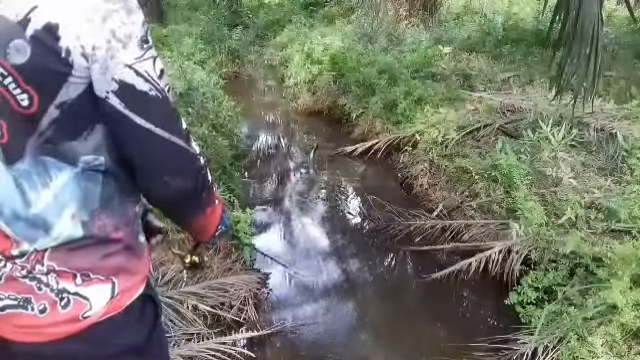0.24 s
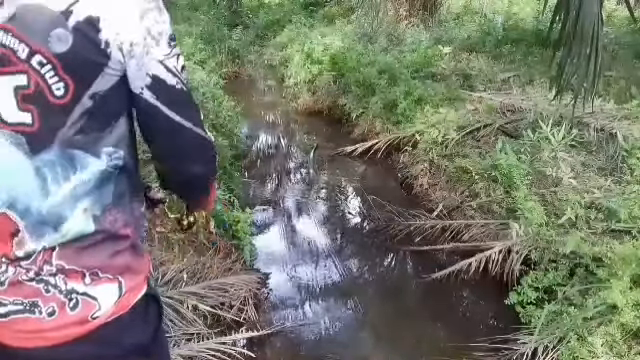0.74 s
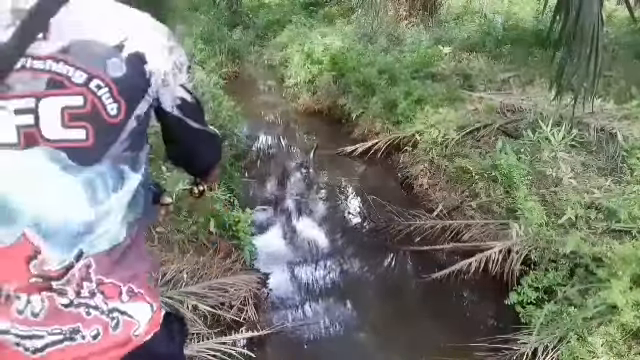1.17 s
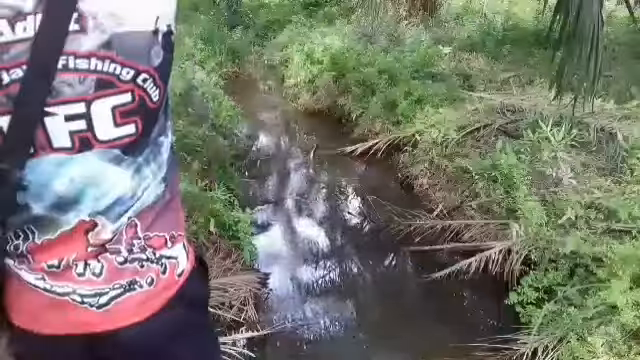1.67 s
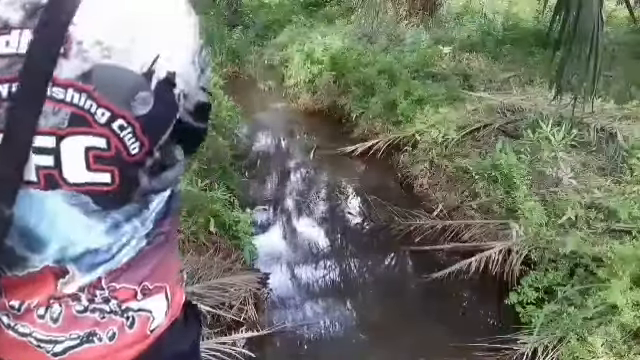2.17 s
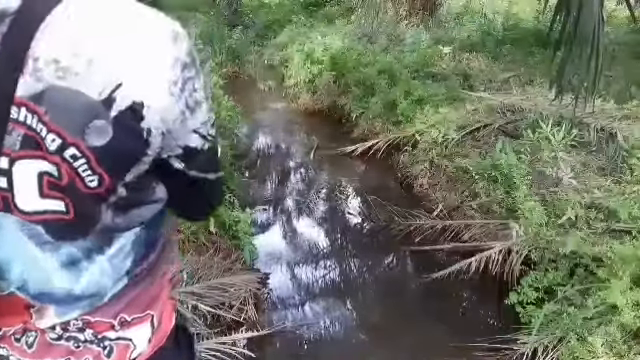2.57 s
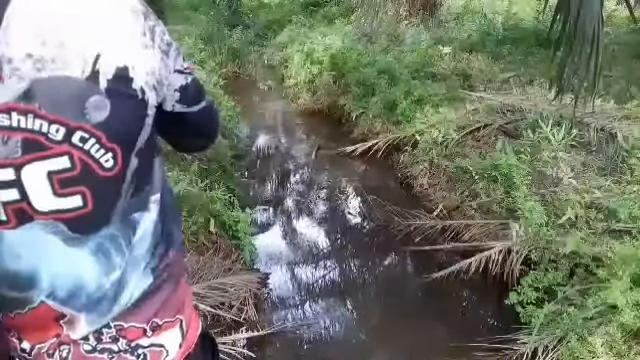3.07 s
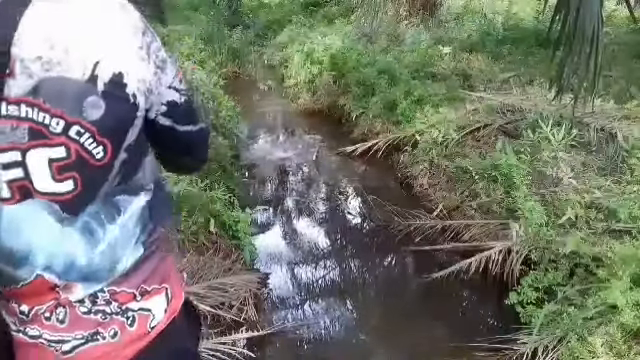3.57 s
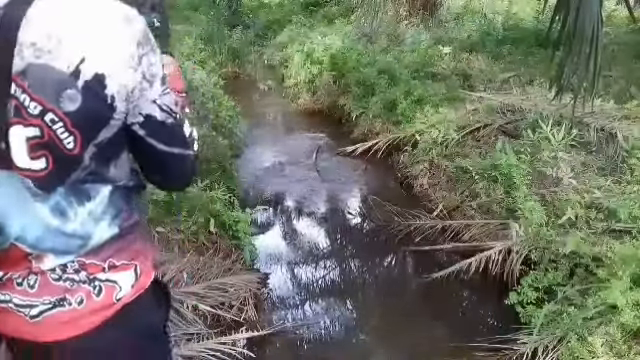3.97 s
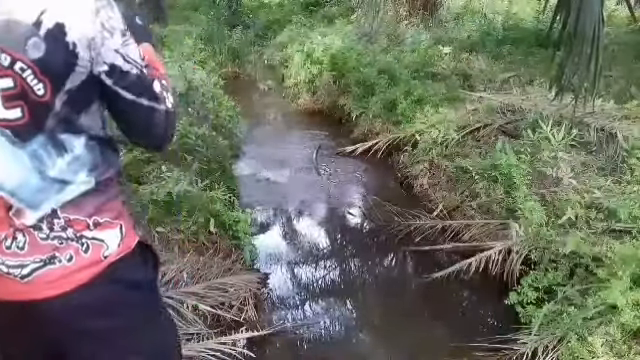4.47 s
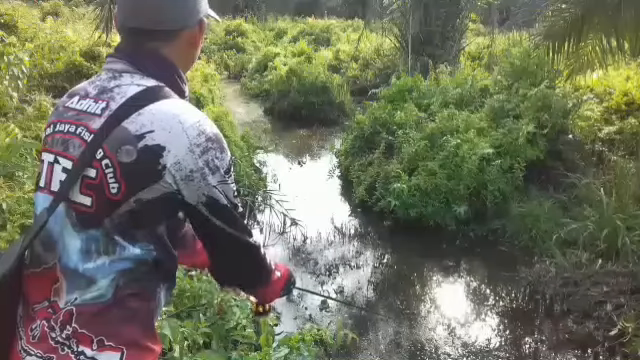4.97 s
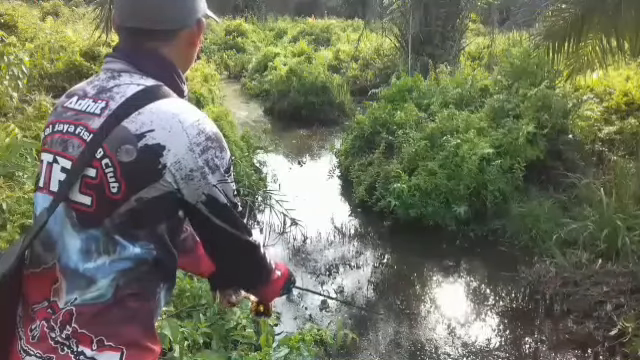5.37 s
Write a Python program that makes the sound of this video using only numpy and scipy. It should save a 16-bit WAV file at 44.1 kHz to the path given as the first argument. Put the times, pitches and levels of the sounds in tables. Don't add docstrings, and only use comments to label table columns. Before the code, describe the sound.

For the first 0.8 seconds there is only quiet open air, soft hiss, distant insects and a very faint high cricket trill. Tiny ticks and light snaps begin, and from about 1.25 s dry palm fronds crackle hard: woody stalks snap, leaf ribs crack, fibres tick and leaflets rustle, with a short whirr of fishing line near 1.5 to 1.6 s. The loudest crack comes at 2.1 s, another bright one at 2.4 s, then the crackle thins until about 3.1 s, with a soft cloth swish at 2.8 s. From 3.3 s something thrashes in the water: hollow bubbles ring upward, drops slap, spray gushes in bursts, with a high gulp at 4.4 s; brief bird notes sound near 4.3 s. At 4.8 s the scene cuts to a calmer spot, with quick gliding bird whistles over faint far cicadas. The microphone resonates sharply on the snaps.

```python
import sys
import numpy as np
from scipy import signal
from scipy.fft import rfft, irfft, next_fast_len
from scipy.io import wavfile

SR = 44100
rng = np.random.default_rng(int(sys.argv[2]) if len(sys.argv) > 2 else 0)


def to_wav(sig):
    pcm = np.clip(np.atleast_2d(sig), -1, 1) * 32767
    pcm = np.round(pcm).astype(np.int16)
    wavfile.write(sys.argv[1], SR, pcm.T)


def boost_factor(decibels):
    exponent = np.asarray(decibels, float) / 20
    return 10 ** exponent


N = 248283
SCENE_CHANGE_S = 4.821
PORT_HZ, PORT_WIDTH_HZ = 4200, 950

# t/s, peak/dB, extra wood/dB
STALKS = [(.7908, -55, -1), (.817, -47, -1), (1.1137, -46.5, -4), (1.1673, -51, -2), (1.2610, -41.5, -5),
          (1.2913, -36.5, -2.5), (1.3303, -30, -9), (1.3386, -33.5, -3.5), (1.4497, -30.5, -9),
          (1.5975, -20.5, -6.5), (1.716, -38, -2.5), (1.8618, -37, -2), (2.0348, -34, -0.5),
          (2.2177, -34.5, -1.5), (2.3447, -40, 0.5), (2.4826, -35, -5), (2.5077, -44, 0), (2.5847, -28, 1),
          (2.8275, -42, -3), (2.9106, -41, -5), (3.114, -42.5, 5.5), (1.4155, -36.5, -2.5),
          (1.4134, -35, -1), (2.2243, -40, 1), (2.2262, -40, 0), (2.2221, -41, 3), (2.2286, -41, 0),
          (2.9038, -47, 4.5)]
# t/s, peak/dB, extra breadth/dB
RIBS = [(.0582, -59, 12), (.8718, -55.5, 1), (1.209, -52, 3), (1.3166, -21.5, 1), (1.4096, -33.5, 6),
        (1.503, -34, -5), (1.523, -22, 2), (1.6287, -27, 10), (1.7111, -35, 11), (1.8893, -26, 14),
        (1.95, -33, 4), (2.0265, -26, 0), (2.1126, -12.5, 12), (2.1905, -33.5, 6), (2.3027, -30, 13.5),
        (2.4012, -29, 1), (2.5683, -23, 5), (2.619, -43, 7), (2.631, -43, 10), (2.695, -40, 3),
        (2.7362, -37.5, -6), (3.0922, -36, 10), (1.5686, -27.5, 8.5), (2.4159, -22.5, 14)]
# t/s, peak/dB, extra tick/dB
FIBRES = [(1.3867, -47, -2), (1.4064, -32, -2), (1.9591, -31, -1), (1.9632, -21, -2), (1.9645, -24, -12),
          (1.985, -34, -3), (1.9871, -35, 1), (2.0091, -27.5, 1), (2.0125, -30, -2), (2.0483, -31, 0),
          (2.091, -46, 6), (2.1098, -39, -7), (2.1544, -34.5, -3), (2.2855, -44, -2), (2.3183, -36, -4),
          (2.3329, -36, -1), (2.3827, -32, -7), (2.3967, -17.5, 7.5), (2.4097, -42, 0), (2.444, -36, -2),
          (2.7817, -39, 3), (2.7937, -36, 0), (2.1246, -34, 6)]
# t/s, peak/dB, extra breadth/dB
TICKS = [(1.042, -60, 7), (1.0512, -59, 5), (1.0811, -60, 5), (1.1052, -58, 0), (1.2003, -56, 1),
         (1.3229, -45, -3), (1.3739, -46, 0), (1.4424, -44, -6), (1.4449, -40, -3), (1.5994, -36, 5),
         (1.6396, -37, 10), (1.6622, -39, 8), (1.6926, -46, 6), (1.7039, -45, 3), (1.7184, -46, 0),
         (1.7626, -44, 7), (1.7732, -47, 0), (1.7954, -44, 5), (1.824, -47, 7), (1.8303, -47, 3),
         (1.8713, -37.5, 0), (1.9012, -31, 1), (1.9229, -41, 1), (1.9814, -31, -2), (2.0245, -36, 4),
         (2.0804, -43, 2), (2.1142, -26, 3), (2.1201, -37, 1), (2.2048, -41, 2), (2.2623, -45, -2),
         (2.3043, -36, -2), (2.3093, -41, -4), (2.3991, -29, 6), (2.4258, -33, -5), (2.4719, -46, 1),
         (2.5808, -47, -2), (2.6487, -45, 0), (2.6608, -42, -9), (2.7963, -46, 1), (2.8191, -46, 3),
         (2.8782, -55, 1), (2.8824, -46, -2), (3.2658, -56, 0), (3.2905, -53, 5), (3.3441, -46, 2)]
# low f/Hz, high f/Hz
SNAP_BANDS = [
    (350, 1200),
    (1200, 2800),
    (6000, 9500),
    (10000, 15500),
]
# t/s, peak/dB
CRISP = [
    (1.3168, -38),
    (1.5977, -36),
    (1.629, -44),
    (2.1127, -22),
    (2.2177, -46),
    (2.2855, -52),
    (2.3967, -24),
    (2.5684, -42),
    (2.7937, -48),
    (3.0922, -52),
]
# t/s, level/dB
BRUSH = [(0.8, -101), (1.03, -82), (1.1, -70), (1.25, -70), (1.35, -62), (1.45, -53), (1.51, -47),
         (1.6, -49.5), (1.67, -56.5), (1.78, -59.5), (1.94, -52.5), (2.05, -60.5), (2.22, -54.5),
         (2.29, -58.5), (2.43, -54.5), (2.55, -61), (2.75, -61.5), (2.89, -68.5), (3.15, -70), (3.2, -66),
         (3.36, -67)]
# t/s, level/dB, length/s
SWISH = [
    (2.815, -57, 0.18),
]
# t/s, peak/dB, f/Hz, length/s
KNOCKS = [(1.409, -39.5, 820, 0.0072), (1.465, -42, 1000, 0.031), (1.636, -43.5, 500, 0.024),
          (2.2, -44.5, 860, 0.034), (2.2, -45, 1060, 0.0034), (2.3, -46, 670, 0.0014),
          (3.27, -45.5, 800, .02), (3.739, -48, 284, 0.045), (3.763, -44, 450, 0.0075),
          (3.3, -49, 970, 0.025), (2, -44.5, 620, 0.0029), (4.715, -49, 1180, 0.026),
          (4.602, -35.5, 740, 0.015), (2.901, -57, 370, 0.072)]
# t/s, level/dB, length/s, brightness/(dB per octave)
WHIRR = [
    (1.494, -44, 0.11, -6),
    (1.542, -41.5, 0.095, -5),
    (1.575, -47, .05, 3),
    (1.633, -52, .03, -8),
    (1.782, -57, .1, 0),
    (2.99, -60.5, 0.073, -7),
]
# f/Hz, width/Hz, level/dB
WHIRR_PEAKS = [
    (6450, 300, -2),
    (6500, 1100, -4),
    (9990, 130, -5),
    (10450, 300, -13),
    (12500, 5500, -9.5),
    (15000, 2000, -13),
]
# t/s, level/dB
SPLASH = [(3.28, -65), (3.372, -61.5), (3.394, -47), (3.43, -52.5), (3.55, -57), (3.62, -52), (3.71, -57),
          (3.785, -50), (3.83, -57), (3.9, -52), (3.96, -57), (4.07, -50), (4.176, -49.5), (4.3, -60),
          (4.46, -60), (4.49, -54), (4.614, -48), (4.66, -57), (4.82, -66.5)]
# t/s, peak/dB, f/Hz
PLOPS = [(3.279, -50, 710), (3.357, -47, 2170), (3.394, -33, 1110), (3.411, -30, 2250), (3.437, -40, 845),
         (3.487, -54, 734), (3.503, -46, 1230), (3.527, -41, 2150), (3.573, -31, 1460), (3.582, -41.5, 730),
         (3.612, -31, 2600), (3.656, -38.5, 858), (3.781, -37, 1160), (3.799, -44, 820), (3.88, -54, 1220),
         (4.011, -41, 900), (4.04, -43, 1360), (4.07, -37, 1224), (4.109, -37, 1370), (4.127, -38, 960),
         (4.159, -30.5, 1230), (4.271, -40.5, 1370), (4.364, -45, 1320), (4.424, -35, 1700),
         (4.483, -43, 767), (4.515, -38.5, 1250), (4.564, -34.5, 946), (4.604, -31, 1510),
         (4.702, -37, 2140), (4.73, -41, 867), (3.893, -40.5, 755), (3.93, -42, 880), (4.14, -44, 870),
         (4.205, -44, 1040), (4.725, -35, 2100), (4.765, -49, 890), (4.78, -49, 870), (4.795, -50, 855),
         (4.63, -42, 1510),
         (4.424, -25.5, 3000),
    (4.555, -29.5, 2780),
]
# t/s, peak/dB
SLAPS = [(3.2798, -42), (3.319, -45), (3.3876, -37), (3.3908, -38), (3.4469, -42), (3.4873, -35),
         (3.5242, -41), (3.611, -40), (3.6783, -41), (3.7263, -42), (3.787, -45), (3.8063, -38),
         (3.854, -38), (3.8659, -40), (3.8817, -36), (3.9268, -45), (3.9709, -40), (4.0066, -40),
         (4.0212, -33), (4.0993, -38), (4.16, -33), (4.2202, -41), (4.254, -43), (4.37, -39),
         (4.4246, -38.5), (4.5407, -40), (4.5889, -34), (4.6076, -44), (4.6772, -42), (4.7977, -44),
         (4.8086, -37.5), (4.8135, -34)]
# t/s, level/dB, dying time/s
GUSHES = [(3.379, -46, 0.034), (3.599, -57.5, 0.036), (3.655, -62, 0.012), (3.722, -56, 0.011),
          (3.78, -54, 0.03), (3.852, -55, 0.014), (3.879, -45.5, 0.013), (3.92, -60, 0.015),
          (4.019, -46.5, 0.032), (4.042, -49, 0.035), (4.105, -53, 0.024), (4.156, -47, 0.024),
          (4.185, -52, .02), (4.334, -55.5, 0.03), (4.36, -52, .008), (4.42, -45, 0.0078),
          (4.47, -55, 0.026), (4.55, -53, 0.046), (4.585, -53, 0.0088), (4.702, -52.5, 0.023),
          (4.806, -50, 0.0091)]
# f/Hz, level/dB
SPRAY = [(880, 22), (1500, -29), (1650, -9), (2400, -2.5), (2620, 3), (2780, -2), (4270, 8.5), (6960, -16),
         (14900, -24), (15500, -19)]
# t/s, level/dB
CRICKET = [(0, -89), (.2, -87), (.3, -81), (1.4, -82), (2.5, -74), (3.2, -80.5), (4.82, -74)]
# f/Hz, width/Hz, level/dB
FAR_INSECTS = [
    (3700, 1300, -79.5),
    (9300, 280, -92),
]
# t/s, length/s, end f/Hz, peak/dB
PLUNGES = [(4.908, 0.043, 4140, -57), (5.244, 0.017, 3520, -63), (5.4, 0.011, 3870, -53),
           (5.482, 0.014, 3500, -62), (5.54, 0.015, 3700, -51), (5.584, 0.0135, 3360, -56),
           (5.596, .012, 2950, -65), (5.384, .012, 4030, -57)]
# t/s, length/s, end f/Hz, peak/dB
DIPS = [(5.04, 0.019, 3960, -70), (5.134, 0.029, 4370, -51.5), (5.332, 0.028, 3870, -51),
        (5.453, 0.021, 4520, -56), (5.467, 0.042, 3920, -68)]
# t/s, length/s, end f/Hz, peak/dB
SAGS = [(.59, 0.103, 3500, -77.5), (.14, .06, 3850, -81), (4.292, 0.03, 3600, -48), (4.315, .03, 3480, -50),
        (4.338, 0.032, 3680, -46), (5.07, 0.028, 3590, -67), (5.155, 0.015, 4400, -64),
        (4.5, .017, 4500, -74), (5.455, .012, 4800, -66), (4.865, .012, 5900, -70)]
# t/s, length/s, end f/Hz, peak/dB
LIFTS = [(4.88, .023, 3930, -56), (5.312, 0.013, 3550, -63), (5.517, 0.027, 4130, -48),
         (5.27, .025, 4100, -69), (5.562, 0.013, 4900, -63), (5.089, 0.03, 4160, -69),
         (5.205, .02, 4450, -69)]
# t/s, length/s, end f/Hz, peak/dB
CALLS_LOW = [(5.02, 0.035, 2420, -70), (5.054, 0.03, 2580, -67), (5.345, .017, 2340, -66),
             (5.525, 0.024, 2370, -65)]
# t/s, length/s, end f/Hz, peak/dB
SCOOPS = [(5.217, 0.029, 4120, -58), (5.418, 0.018, 3890, -53.5), (5.572, 0.014, 3730, -59),
          (5.6, 0.013, 3750, -63), (5.535, 0.022, 4670, -62)]
# f/Hz, width/Hz, level/dB
CICADAS = [
    (8140, 240, 0),
    (8450, 260, 1),
    (9200, 500, -6),
    (9750, 500, -15),
]
# f/Hz, level/dB
AIR_FIRST = [(15, -65), (25, -14), (50, -7), (92, -10), (134, -6.5), (206, -6.5), (285, -8), (405, -9.5),
             (754, -10.5), (2350, -18), (2610, -20), (3250, -30), (8360, -27), (16000, -29)]
# f/Hz, level/dB
AIR_SECOND = [(15, -33), (25, -21), (55, -23.5), (575, -22), (2840, -31), (4370, -30.5), (5600, -38.5),
              (7600, -37.5), (8300, -33), (10700, -40), (14800, -41.5), (16000, -31.5)]
# f/Hz, level/dB
SIDE_HISS = [(15, -42), (25, -25), (60, -7), (145, -7), (175, -1), (217, -5), (503, -5.5), (545, -6),
             (677, -6.5), (936, -6.5), (3620, -11), (16000, -19)]


def rms_one(x):
    return x / np.sqrt(np.mean(x ** 2) + 1e-24)


def in_time(rows):
    s, *columns = np.transpose(rows)
    clock = np.arange(N) / SR
    return [boost_factor(np.interp(clock, s, c, left=-200, right=-200)) for c in columns]


def drift(rate):
    knots_per_s = 200
    knots = rng.standard_normal(int(N / SR * knots_per_s) + 2)
    r = np.exp(-2 * np.pi * rate / knots_per_s)
    smooth = rms_one(signal.lfilter([1], [1, -r], knots))
    return np.interp(np.arange(N) / SR * knots_per_s, np.arange(len(knots)), smooth)


def peak(x, hz, width_hz):
    r = np.exp(-np.pi * width_hz / SR)
    ring = [1, -2 * r * np.cos(2 * np.pi * hz / SR), r * r]
    return signal.lfilter([(1 - r * r) / 2, 0, (r * r - 1) / 2], ring, x + 1e-18)


def band(x, low_hz, high_hz, order=2):
    return signal.sosfilt(signal.butter(order, [low_hz, high_hz], "band", fs=SR, output="sos"), x)


def coloured(spectrum):
    size = next_fast_len(N)
    hz, level_db = np.transpose(spectrum)
    bins_hz = np.arange(size // 2 + 1) * SR / size
    shape_db = np.interp(np.log(bins_hz + 1), np.log(hz), level_db)
    return rms_one(irfft(rfft(rng.standard_normal(size)) * boost_factor(shape_db), size)[:N])


def grains(per_s, spread_db, low_hz, high_hz, cycles, clump_db, count=12):
    born = rng.random(N) < per_s * boost_factor(clump_db * drift(25)) / SR
    size = boost_factor(spread_db * np.minimum(rng.exponential(1, N), 4))
    clicks = born * size * rng.choice([-1, 1], N)
    dealt = rng.integers(0, count, N)
    out = np.zeros(N)
    for k, hz in enumerate(np.geomspace(low_hz, high_hz, count)):
        out += peak(clicks * (dealt == k), hz, 2 * hz / cycles) / np.sqrt(hz)
    return rms_one(out)


def patchy(x, patchy_db, rate):
    edges = 1400 * 2 ** np.arange(0, 3.6, .5)
    out = np.zeros(N)
    for k in range(len(edges) - 1):
        out += (-1) ** k * band(x, edges[k], edges[k + 1]) * boost_factor(patchy_db * drift(rate))
    return rms_one(out)


def strokes(rows):
    rise_s, fall_db = .015, 15
    clock = np.arange(N) / SR
    out = np.zeros(N)
    for s, db, length in rows:
        catch = np.clip((clock - s) / rise_s, 0, 1)
        out += catch * boost_factor(db - fall_db * np.clip((clock - s) / length, 0, 4) ** 2)
    return out


def add(out, s, sound):
    i = round(s * SR)
    out[i:i + len(sound)] += sound[:max(N - i, 0)]


def snaps(rows, crack_s, tail_s):
    out, t = np.zeros(N), np.arange(2600) / SR
    s, peak_db, tail_db, *shares_db = np.transpose(rows)
    white = rng.standard_normal((len(s), len(t)))
    white[:, 0] = 6
    lags_s = rng.uniform(.0005, .0013, len(s))
    crack = white * np.exp(-t / crack_s)
    back = np.array([np.roll(c, round(lag * SR)) for c, lag in zip(crack, lags_s)])
    tail = white * boost_factor(tail_db)[:, None] * np.exp(-t / tail_s)
    burst = crack + .5 * back + tail
    port = peak(burst, PORT_HZ, PORT_WIDTH_HZ) + .25 * band(burst, 2800, 6000)
    parts = [band(port, 2800, 6200)]
    parts += [band(band(burst, *edges), *edges) for edges in SNAP_BANDS]
    sounds = 0
    for part, db in zip(parts, [0, *shares_db]):
        sounds = sounds + boost_factor(peak_db + db)[:, None] * part / np.abs(part).max(axis=1, keepdims=True)
    for start, sound in zip(s, sounds):
        add(out, start, sound)
    return out


def fronds():
    # table, level/dB in each snap band, how far the extra dB reaches into each, tail/dB
    kinds = [(STALKS, (-18.5, -5, -24, -21), (.9, 1, 0, 0), -17.5),
             (RIBS, (-34, -25.5, -22.5, -33.5), (1, 1, .8, .8), -20),
             (FIBRES, (-21, -16.5, -7.5, -21.5), (0, 0, 1, .6), -15.5),
             (TICKS, (-22, -14.5, -22, -33), (1, 1, 1, 1), -26)]
    rows = []
    for table, kind_db, reach, tail_db in kinds:
        for s, db, extra_db in table:
            rows.append((s, db, tail_db, *(kind_db + extra_db * np.array(reach))))
    return snaps(rows, 0.00042, tail_s=0.013)


def crisp():
    out, t = np.zeros(N), np.arange(400) / SR
    for s, peak_db in CRISP:
        white = rng.standard_normal(len(t))
        white[0] = 3
        spit = band(white * np.exp(-t / .0006), 6000, 9500)
        add(out, s, boost_factor(peak_db) * spit / np.abs(spit).max())
    return out


def leaves():
    rustle, = in_time(BRUSH)
    crunch = boost_factor(-27) * rustle ** .62
    fizz = boost_factor(-55) * rustle ** 0.44
    crackle = grains(1900, 2.2, 2200, 6500, 2.5, clump_db=4.5) + .9 * rng.standard_normal(N)
    ported = band(peak(crackle, PORT_HZ, PORT_WIDTH_HZ), 1670, 5700) + 0.27 * band(crackle, 1500, 7300)
    body = patchy(ported, 0.54, 55)
    low_grains = grains(250, 2.7, 250, 1480, 1.45, clump_db=8.0)
    low = rms_one(low_grains + rms_one(band(rng.standard_normal(N), 365, 2750)))
    top = rms_one(band(crackle, 9500, 15500))
    swish = strokes(SWISH) * rms_one(peak(rng.standard_normal(N), 1380, 280))
    return boost_factor(2.5) * rustle * body + crunch * low + fizz * top + swish


def knocks():
    out, t = np.zeros(N), np.arange(6000) / SR
    for s, peak_db, hz, length in KNOCKS:
        burst = rng.standard_normal(len(t)) * t * np.exp(-2 * t / length)
        body = peak(peak(burst, hz, 1.4 * hz), hz, 1.4 * hz)
        add(out, s, boost_factor(peak_db) * body / np.abs(body).max())
    return out


def whirr():
    rub = rng.standard_normal(N) * boost_factor(drift(40))
    out = np.zeros(N)
    for hz, width_hz, db in WHIRR_PEAKS:
        octaves = np.log2(hz / 8000)
        runs = strokes([(s, level_db + slope_db * octaves, length) for s, level_db, length, slope_db in WHIRR])
        out += runs * boost_factor(db) * rms_one(peak(peak(rub, hz, width_hz), hz, width_hz))
    return boost_factor(-11) * out


def large_bubbles():
    out, t = np.zeros(N), np.arange(3000) / SR
    for s, peak_db, hz in PLOPS:
        turns = hz * (t + 1.2 * t ** 2)
        ring = np.sin(2 * np.pi * turns) + .2 * np.sin(2 * np.pi * 1.55 * turns)
        add(out, s, boost_factor(peak_db + 1.5) * (1 - np.exp(-t / .0012)) * np.exp(-t * hz / 4.3) * ring)
    return out


def splash():
    vigour, = in_time(SPLASH)
    clock = np.arange(N) / SR
    early_db = -3.5 * (clock < 3.385)
    spray = boost_factor(-34.5 + early_db) * vigour ** 0.34 * (clock > SPLASH[0][0])
    gush = np.zeros(N)
    for s, db, dying_s in GUSHES:
        gush += boost_factor(db) * np.clip((clock - s) / 0.007, 0, 1) * np.exp(-np.abs(clock - s) / dying_s)
    small = grains(420, 3.4, 700, 1900, 11.0, clump_db=6.0, count=16)
    small = small + .45 * rms_one(band(rng.standard_normal(N), 650, 2500))
    drops = grains(600, 3.6, 1500, 5500, 3.0, clump_db=5.0)
    wash = patchy(coloured(SPRAY), 2.8, 25) + boost_factor(-5.5) * band(drops, 1200, 5500)
    out = boost_factor(-0.5) * vigour * rms_one(band(small, 710, 5700))
    out = out + spray * wash + gush * (band(wash, 410, 8300) + 0.38 * wash)
    slosh = rms_one(band(rng.standard_normal(N), 207, 1160))
    slaps = snaps([(s, db, -30, -14, -7, -24, -34) for s, db in SLAPS], 0.00032, 0.011)
    return out + boost_factor(-10) * vigour * slosh + large_bubbles() + slaps


def birds():
    out = np.zeros(N)
    sung = [(PLUNGES, 0.21), (DIPS, 0.128), (SAGS, 0.0494), (LIFTS, -0.015), (CALLS_LOW, -0.084), (SCOOPS, -.12)]
    for notes, share in sung:
        for s, length, end_hz, peak_db in notes:
            u = np.linspace(0, 1, round(length * SR))
            flutter = 0.0083 * np.sin(2 * np.pi * 70 * length * u)
            hz = end_hz * (1 + share * (1 - u) ** 2.57 + flutter)
            whistle = np.sin(2 * np.pi * np.cumsum(hz) / SR)
            add(out, s, boost_factor(peak_db) * np.sin(np.pi * u) ** 1.44 * whistle)
    out = out * boost_factor(2 * drift(90))
    trees = rng.standard_normal(9000) * np.exp(-np.arange(9000) / SR / 0.045)
    smear = signal.fftconvolve(out, trees / np.sqrt(np.sum(trees ** 2)))[:N]
    return out + boost_factor(-6) * smear


def cricket():
    trills_per_s, note_hz, start_s = 19.8, 8400, .262
    t = np.arange(N) / SR
    beat = np.cos(2 * np.pi * trills_per_s * (t - start_s))
    note = np.sin(2 * np.pi * note_hz * t + .8 * drift(60)) * boost_factor(2 * drift(12))
    return boost_factor(2.5) * in_time(CRICKET)[0] * np.clip(.7 * beat + .65, .25, 1) * note


def far_insects():
    out = np.zeros(N)
    for hz, width_hz, db in FAR_INSECTS:
        out += boost_factor(db + 0.93 * drift(8.8)) * rms_one(peak(rng.standard_normal(N), hz, width_hz))
    return out


def cicadas():
    white = band(rng.standard_normal(N), 7950, 10100, order=6)
    chorus = np.zeros(N)
    for hz, width_hz, db in CICADAS:
        chorus += boost_factor(db) * rms_one(peak(white, hz, width_hz)) * boost_factor(2.3 * drift(16))
    return boost_factor(-75) * rms_one(chorus)


def air(spectrum, level_db):
    return boost_factor(level_db) * coloured(spectrum)


def scene():
    before = np.arange(N) < SCENE_CHANGE_S * SR
    first = fronds() + crisp() + leaves() + knocks() + whirr() + splash()
    first = first + cricket() + far_insects() + air(AIR_FIRST, -69.5)
    second = cicadas() + air(AIR_SECOND, -67.5)
    middle = np.where(before, first, second) + birds()
    apart = air(SIDE_HISS, -70.5)
    return middle + apart * np.array([[1], [-1]])


def top_cut(x):
    return signal.sosfilt(signal.butter(12, 16540, fs=SR, output="sos"), x)


def record(dry):
    rolled = signal.sosfilt(signal.butter(16, 15650, fs=SR, output="sos"), dry)
    cut = signal.sosfilt(signal.cheby2(12, 60, 16550, fs=SR, output="sos"), rolled)
    mix = cut - 0.00056
    return top_cut(mix)


dry = scene()
out = record(dry)
to_wav(out)
```